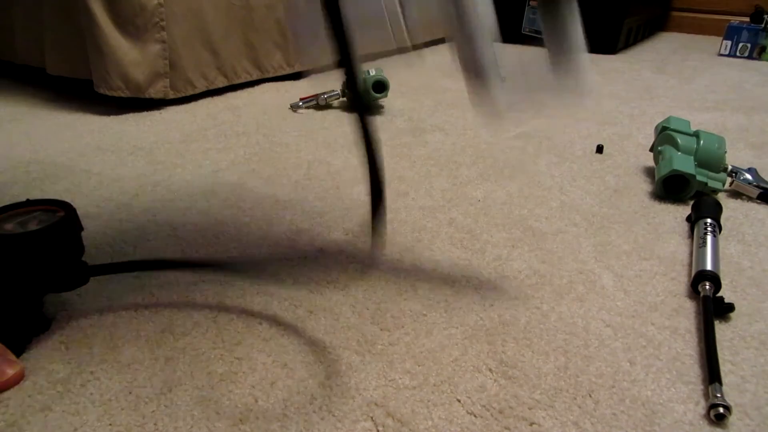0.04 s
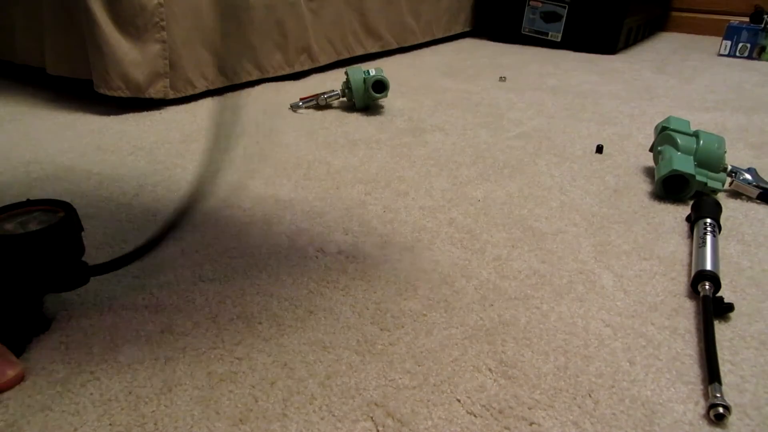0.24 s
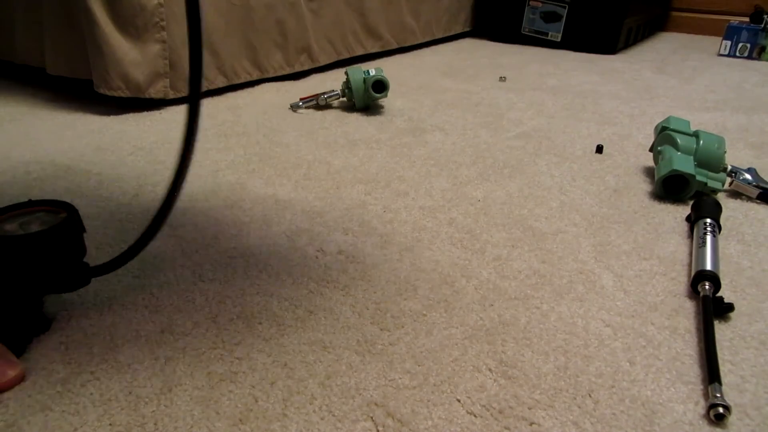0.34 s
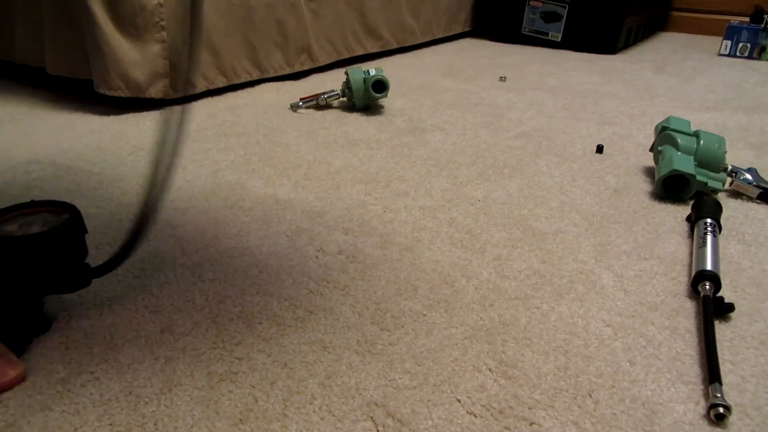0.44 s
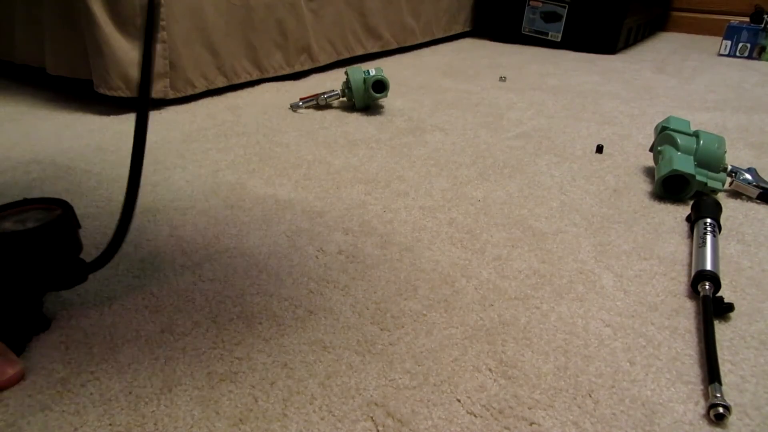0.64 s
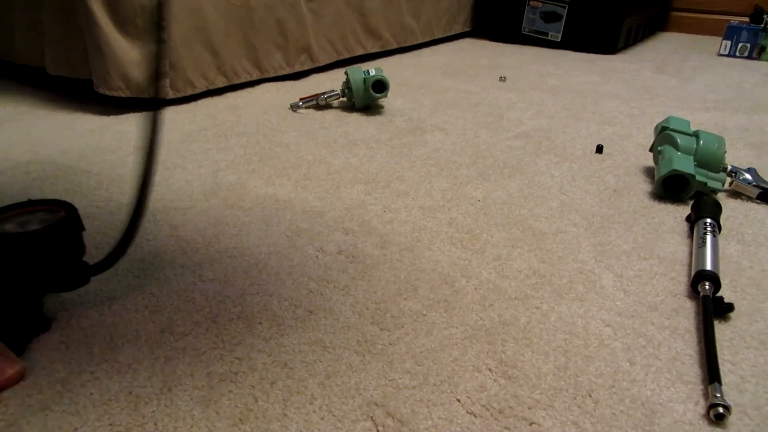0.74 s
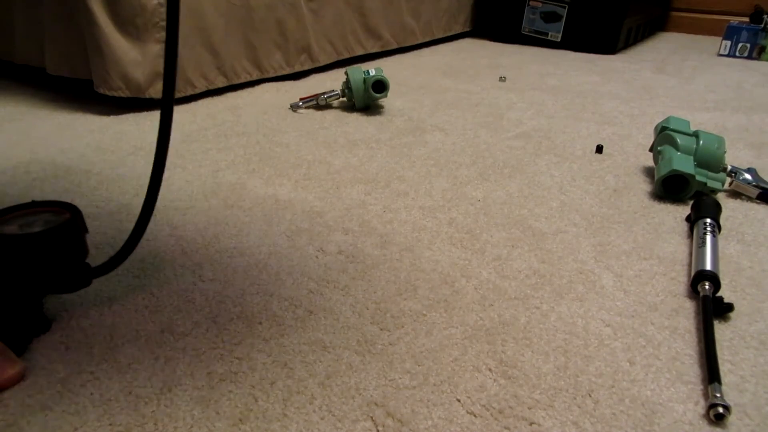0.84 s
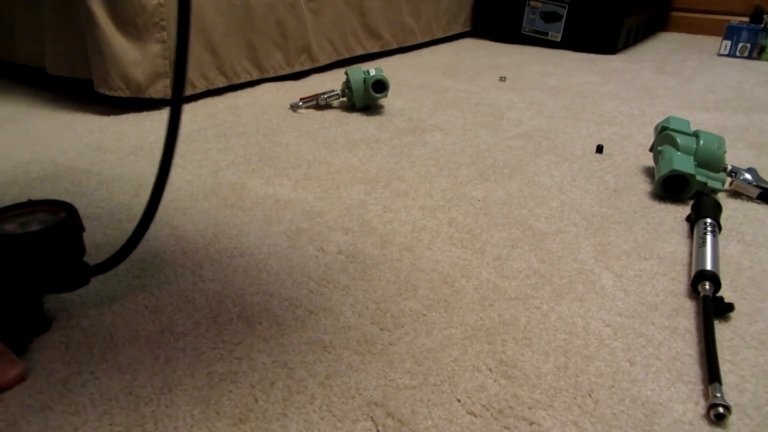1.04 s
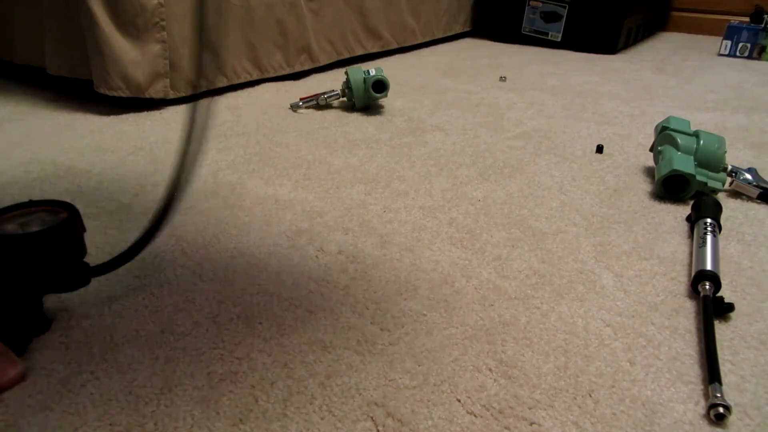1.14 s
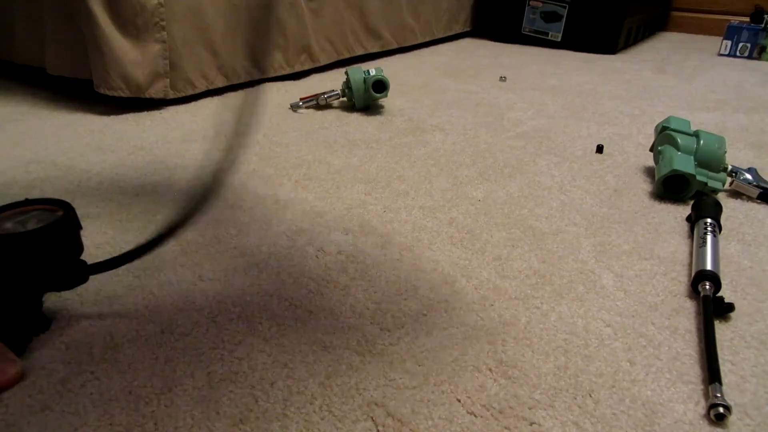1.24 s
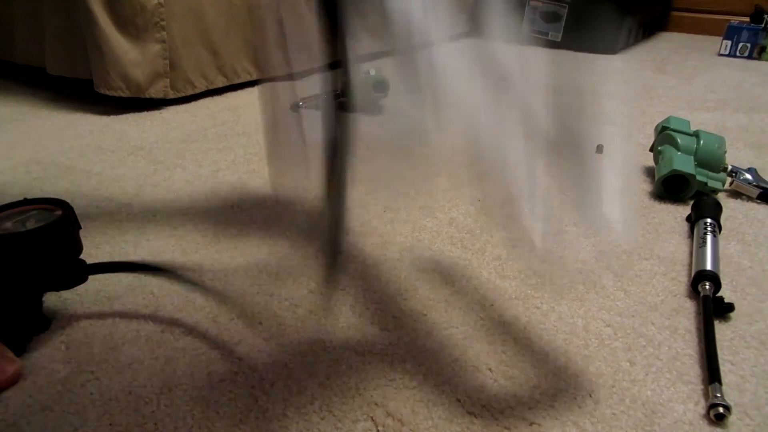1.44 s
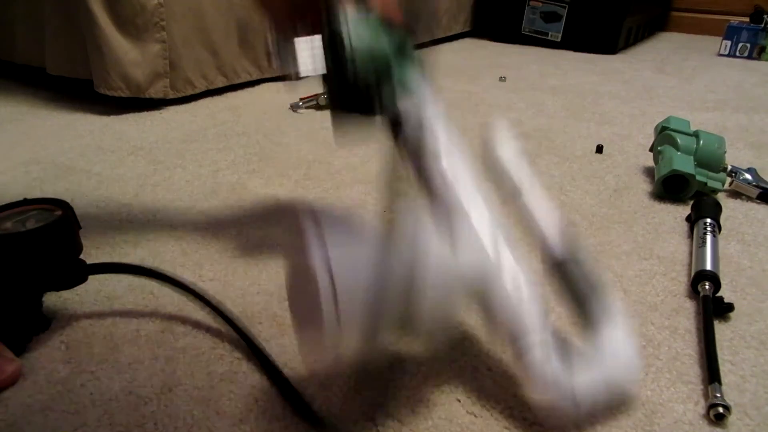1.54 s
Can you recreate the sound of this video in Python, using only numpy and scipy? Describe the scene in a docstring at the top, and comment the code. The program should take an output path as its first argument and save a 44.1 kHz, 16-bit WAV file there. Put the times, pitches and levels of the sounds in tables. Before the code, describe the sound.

A hand air pump is worked once, close by in a carpeted room. Its handle clacks, the piston rubs up with a brief squeak and slides down, air hisses, and a sharp knock leaves a softer hiss and light clicks.

```python
"""A handle clacks, then a hand air pump rubs and hisses through one stroke, close by in a carpeted room.
The piston's seal rubs up the barrel and down again, making the tube ring with many tiny slips.
Air hisses through the valve and hose, and the piston knocks on the bottom.
A softer hiss with a sinking pitch lingers among a few light clicks."""
import sys
import numpy as np
from scipy import signal
from scipy.fft import rfft, irfft
from scipy.io import wavfile

SR = 44100
rng = np.random.default_rng(int(sys.argv[2]) if len(sys.argv) > 2 else 0)


def digitize_waveform(pressure):
    """Quantize a signal to 16-bit integers and store it at the path in sys.argv[1].

    Rows of a 2-D input are taken as channels; values are limited to [-1, 1].
    """
    field = np.atleast_2d(pressure).T
    bounded = np.clip(field, -1, 1)
    quanta = np.round(bounded * 32767).astype(np.int16)
    wavfile.write(sys.argv[1], SR, quanta)


N = 70560
T = np.arange(N) / SR
BINS_HZ = np.maximum(np.fft.rfftfreq(N, 1 / SR), 1)

# ringing tones of a clack or snap: pitch_hz, level_db, ring_s (time to fade by 60 dB)
CLACK_TONES = [(676, -6.5, 0.021), (860, -6.5, 0.021), (1410, -14.5, 0.017), (1950, -5.5, 0.0097),
               (2450, -1, 0.012), (3190, -5.5, 0.0049), (3670, -4.5, 0.0032), (5260, -8, 0.0052),
               (6800, -29, 0.0085)]
# tone colour of a clack or snap: pitch_hz, gain_db
CLACK_COLOUR = [(100, -11.5), (480, -13), (700, -3), (7000, -1), (9000, -13), (13000, -18)]
# stereo width of the pump and of the hiss: pitch_hz, side_db (compared with the middle)
PUMP_WIDTH = [(40, -3), (150, -16), (500, -19.5), (1200, -19.5), (2200, -15.5), (4200, -9.5), (8000, -4),
              (13000, 2.5)]
HISS_WIDTH = [(500, -15), (2000, -13.5), (4000, -13.5), (8000, -8), (13000, -11.5)]


def seal_rub(stroke):
    """Tiny slips of the seal ring the barrel; the faster it slides, the higher their strongest pitch."""
    # tone colour of the rub: pitch_hz, gain_db
    rub_colour = [(60, -48), (110, -13), (160, -5.5), (300, -3), (600, 2), (1000, 4.5), (2000, 9),
                  (5000, 18.5)]
    peak_db, peak_octaves, treble_slope, flutter_db = 6, 0.24, 2.66, 2
    slips = rfft(colour(barrel(tiny_slips(per_s=2500, spread_db=2)), rub_colour))
    edge_octave = np.log2(pitch(stroke))
    rub, power = 0, 0
    # narrow bands are boosted near the moving edge pitch and turned down above it
    for octave in np.arange(5, 14, 1 / 3):
        band = irfft(slips * np.maximum(1 - 3 * np.abs(np.log2(BINS_HZ) - octave), 0), N)
        above = octave - edge_octave
        peak = from_db(peak_db * np.exp(-(above / peak_octaves) ** 2 / 2))
        gain = peak / np.sqrt(1 + 2 ** (2 * treble_slope * above))
        rub += gain * band
        power += gain ** 2 * np.mean(band ** 2)
    flutter = from_db(flutter_db * drift(rate_hz=53))
    return unit_power(rub / np.sqrt(power)) * level(stroke) * flutter


def seal_rasp():
    """Coarser, brighter slips swell and die away where the seal catches."""
    # each catch: peak_s, level_db, rise_s, fall_s
    catches = [(.284, -21.5, 0.011, 0.022), (.324, -23.5, 0.011, 0.024), (.349, -30.5, .008, 0.017),
               (.605, -40.5, 0.0068, 0.022), (.65, -33.5, 0.054, 0.018)]
    # tone colour of the rasp: pitch_hz, gain_db
    rasp_colour = [(300, -42.5), (800, -9), (1400, -5.5), (2400, -6), (3600, -6), (5500, -17),
                   (8000, -25.5), (15000, -32)]
    slips = barrel(tiny_slips(per_s=2200, spread_db=3))
    return swells(catches) * unit_power(colour(slips, rasp_colour))


def seal_chatter():
    """The seal sticks and slips almost evenly, so the tube squeaks, then it snaps free."""
    # each squeak: peak_s, level_db, rise_s, fall_s
    squeaks = [(.252, -21.5, .004, .008), (.262, -14.5, .003, .004)]
    # tone colour of the squeak: pitch_hz, gain_db
    squeak_colour = [(400, -25), (750, -2), (1420, -4), (1750, 11), (2100, 1), (3300, 5.5), (4500, -2),
                     (6500, -16), (9000, -17), (15000, -41)]
    slip_hz, jitter, spread_db = 705, 0.046, 2.5
    snap_s, snap_db = .2629, -12
    cycles = np.floor(np.cumsum(slip_hz * (1 + jitter * drift(rate_hz=300))) / SR)
    pulses = np.diff(cycles, prepend=0) * from_db(spread_db * rng.standard_normal(N))
    pulses += from_db(-1.5) * resonate(pulses, hz=1430, width_hz=71)
    squeak = swells(squeaks) * unit_power(colour(barrel(pulses), squeak_colour))
    return squeak + from_db(snap_db) * colour(strike(snap_s, CLACK_TONES), CLACK_COLOUR)


def tiny_slips(per_s, spread_db):
    """The seal slips at random moments, each time by a different amount."""
    sizes = from_db(spread_db * np.minimum(rng.exponential(1, (2, N)), 4))
    signs = rng.choice([-1, 1], (2, N))
    slipping = rng.random((2, N)) < per_s / SR
    return widen(sizes * signs * slipping, PUMP_WIDTH)


def barrel(x):
    """The pump tube rings with whatever rubs inside it."""
    # where the tube rings: pitch_hz, width_hz, gain_db
    tube_tones = [(612, 30, 3), (650, 20, 1), (746, 20, 2), (853, 16, 3), (933, 14, 14), (1010, 14, 10),
                  (1091, 16, 4), (1431, 50, 8), (1484, 16, 11), (1577, 16, 7), (1955, 30, 6), (2025, 20, 7),
                  (2226, 20, 5), (2532, 24, 7), (3306, 30, 8)]
    return x + sum(from_db(db) * resonate(x, hz, width) for hz, width, db in tube_tones)


def piston_knock():
    """The piston hits bottom with a sharp crack, then the base kicks back with a dull ring and the tube rings
    on."""
    # ringing tones of the knock, from the base and the tube it sets ringing: pitch_hz, level_db, ring_s
    knock_tones = [(188, -26.5, 0.084), (366, -21, 0.022), (510, -2, .014), (592, -2, 0.027),
                   (612, -25.5, 0.18), (847, -20, 0.12), (945, -23, 0.089), (1490, -7.5, 0.021),
                   (2070, -41, .014), (3650, -4, 0.0036)]
    hit_s, crack_s, kick_delay_s = 1.1639, 0.00015, 0.000734
    crack = from_db(-5.5) * np.exp(-((T - hit_s - 2 * crack_s) / crack_s) ** 2)
    return crack - from_db(-9.5) * strike(hit_s + kick_delay_s, knock_tones)


def handle_clack():
    """The hard plastic handle hits and bounces a few times very quickly."""
    # each hit: start_s, level_db
    hits = [(.048, -22), (.0494, -19.5), (.0504, -23), (.0537, -35)]
    return colour(sum(from_db(db) * strike(s, CLACK_TONES) for s, db in hits), CLACK_COLOUR)


def hose_hiss():
    """A jet of air from the valve makes the hose ring at its own steady pitches."""
    # loudness of the flow: time_s, level_db
    flow = [(.68, -46), (.75, -43.5), (.82, -41), (.9, -37), (1.0, -35), (1.12, -34), (1.17, -35),
            (1.22, -42), (1.27, -45), (1.34, -47.5), (1.5, -73)]
    # where the hose rings: pitch_hz, width_hz, gain_db
    hose_tones = [(777, 48, 16.5), (1311, 31, 26.5), (1760, 49, 21.5), (2111, 59, 19), (2870, 110, 10),
                  (3453, 45, 20.5), (3730, 82, 19), (4270, 61, 17.5), (4670, 44, 18), (5440, 83, 12.5),
                  (5820, 47, 14.5), (6850, 43, 11.5), (7260, 42, 10.5), (7790, 49, 8), (8580, 100, 13.5),
                  (9930, 200, 7), (14400, 440, 3)]
    # tone colour of the flow: pitch_hz, gain_db
    flow_colour = [(300, -5.5), (900, -3.5), (2000, 2.5), (2500, -2), (3400, 1.5), (5000, 3), (9000, 0),
                   (10700, 0), (11800, -10), (13000, 0), (14600, -5.5), (16000, 3)]
    jet = noise(HISS_WIDTH)
    ringing = sum((-1) ** k * from_db(db) * resonate(jet, hz, width)
                  for k, (hz, width, db) in enumerate(hose_tones))
    return level(flow) * unit_power(colour(noise(HISS_WIDTH) + ringing, flow_colour))


def piston_draught():
    """Air hisses smoothly past the moving piston."""
    # loudness of the draught: time_s, level_db
    loudness = [(.12, -57.5), (.168, -48), (.22, -39.5), (.27, -36), (.36, -36.5), (.44, -39), (.48, -43.5),
                (.52, -62), (.56, -53), (.61, -49), (.68, -45), (.742, -39.5), (.8, -55), (.9, -61)]
    # tone colour of the draught: pitch_hz, gain_db
    draught_colour = [(1000, -14.5), (3400, 2), (5200, -5), (7200, 2), (9000, -6), (12000, -13.5),
                      (15500, -19)]
    return level(loudness) * unit_power(colour(noise(PUMP_WIDTH), draught_colour))


def seeping_air():
    """Air seeps after the stroke, with a breathy whistle that sinks as the pressure eases."""
    # course of the seeping: time_s, level_db, pitch_hz
    seep = [(1.2, -60, 1940), (1.27, -52, 1922), (1.31, -41, 1935), (1.38, -43, 1850), (1.45, -42.5, 1790),
            (1.53, -43.5, 1728), (1.56, -53.5, 1710), (1.6, -53, 1740)]
    # tone colour of the seeping: pitch_hz, gain_db
    seep_colour = [(400, -13), (850, 0), (1300, -4), (2350, 1.5), (2900, -4.5), (3600, 5), (4050, -3.5),
                   (4800, -4.5), (6000, -10), (9500, -16), (15000, -30)]
    width_hz, whistle_gain_db = 80, 16
    wobble = signal.sosfilt(signal.butter(1, width_hz / 2, fs=SR, output="sos"), noise(HISS_WIDTH))
    whistle = np.sqrt(2) * wobble * np.cos(2 * np.pi * np.cumsum(pitch(seep)) / SR)
    hiss = noise(HISS_WIDTH) + from_db(whistle_gain_db) * whistle
    return level(seep) * unit_power(colour(hiss, seep_colour))


def valve_clicks():
    """The valve and fittings click: each click is a tiny burst of noise around one pitch."""
    # each click: start_s, level_db, pitch_hz, fade_s
    clicks = [(0.144, -52, 2020, .003), (0.5436, -40.5, 3940, 0.0045), (0.664, -26.5, 4140, .0016),
              (.664, -34.5, 8500, 0.0018), (0.87, -39, 9100, .003), (1.2443, -35, 12100, .002),
              (1.2786, -30.5, 5370, 0.0017), (1.2792, -41, 12000, .0015), (1.292, -32.5, 4000, 0.0019),
              (1.44, -55, 5000, .0015), (1.466, -31, 5140, 0.0014), (1.5103, -39, 7000, 0.0028),
              (1.519, -34, 7000, 0.0018), (1.5192, -39, 2820, .002), (1.529, -53, 7300, .007)]
    sound = 0
    for start_s, db, hz, fade_s in clicks:
        burst = noise(HISS_WIDTH) * (T >= start_s) * np.exp(-np.abs(T - start_s) / fade_s)
        width_hz = 0.4 * hz
        click = resonate(resonate(burst, hz, width_hz), hz, width_hz)
        sound += from_db(db) * np.sqrt(SR / width_hz) * click
    return sound


def carpet_thuds():
    """The pump shifts on the carpet as the piston sets off up, then down."""
    # each thud: start_s, level_db
    thuds = [(.141, -39.5), (0.5434, -39)]
    # low tones of a thud: pitch_hz, level_db, ring_s
    thud_tones = [(155, -1.5, 0.086), (230, 0.5, 0.063), (423, -15, .025)]
    return sum(from_db(db) * strike(s, thud_tones) for s, db in thuds)


def in_room(x, echo_db):
    """The carpeted room adds a short, soft echo to a sound."""
    # tone colour of the echo: pitch_hz, gain_db
    echo_colour = [(100, -9), (350, -7.5), (520, -0.5), (700, 0), (1200, 1.5), (2500, 4), (6000, -5),
                   (15000, -12)]
    ring_s, gap_s, side_db = .22, .007, -12
    middle, side = colour(rng.standard_normal((2, N)), echo_colour)
    fade = np.exp(-np.log(1000) * T / ring_s) * (T > gap_s)
    stereo = middle + from_db(side_db) * side * np.array([[1], [-1]])
    tail = stereo * fade / np.sqrt(np.sum(fade ** 2))
    return x + from_db(echo_db) * signal.fftconvolve(np.atleast_2d(x), tail, axes=1)[:, :N]


def background():
    """Quiet, wide room noise lies under everything."""
    # tone colour of the room noise: pitch_hz, gain_db
    noise_colour = [(25, -9), (60, -9), (100, -11.5), (160, -3.5), (230, -3.5), (290, 2), (370, -6.5),
                    (560, -4.5), (900, -9.5), (2000, -9.5), (3500, -11.5), (7000, -20.5), (15000, -28)]
    # its stereo width: pitch_hz, side_db
    noise_width = [(30, 8), (80, 10), (200, 2.5), (500, 6), (1000, 12), (2500, 5.3), (13000, 3.5)]
    return from_db(-45.5) * unit_power(colour(noise(noise_width), noise_colour))


def from_db(db):
    """Turn decibels into a number to multiply by."""
    return 10 ** (np.asarray(db) / 20)


def unit_power(x):
    """Scale a sound so its average power is 1."""
    return x / np.sqrt(np.mean(x ** 2) + 1e-20)


def level(rows):
    """Loudness from time_s, level_db rows: silent before them, fading after them."""
    s, db = np.transpose(rows)[:2]
    fade_out = np.exp(-np.maximum(T - s[-1], 0) * 20)
    return from_db(np.interp(T, s, db)) * (T >= s[0]) * fade_out


def pitch(rows):
    """Pitch over time from time_s, level_db, pitch_hz rows."""
    s, _, hz = np.transpose(rows)
    return np.interp(T, s, hz)


def swells(rows):
    """Loudness that rises to each peak and falls away."""
    return np.sqrt(sum(from_db(db) ** 2 * np.exp(-2 * np.maximum((s - T) / rise, (T - s) / fall))
                       for s, db, rise, fall in rows))


def colour(x, points):
    """Turn pitches up or down along pitch_hz, gain_db points."""
    hz, db = np.transpose(points)
    return irfft(rfft(x) * from_db(np.interp(np.log(BINS_HZ), np.log(hz), db)), N)


def resonate(x, hz, width_hz):
    """Let a sound ring around one pitch and weaken the rest."""
    r = np.exp(-np.pi * width_hz / SR)
    feedback = [1, -2 * r * np.cos(2 * np.pi * hz / SR), r * r]
    return signal.lfilter(np.array([1, 0, -1]) * (1 - r * r) / 2, feedback, x + 1e-18)


def strike(start_s, tones):
    """One hit starts several tones, each fading at its own speed."""
    age = np.maximum(T - start_s, 0)
    return sum(from_db(db - 60 * age / ring_s) * np.sin(2 * np.pi * hz * age) for hz, db, ring_s in tones)


def widen(pair, width):
    """Make left and right from a middle sound and an unrelated side sound."""
    return pair[0] + colour(pair[1], width) * np.array([[1], [-1]])


def noise(width):
    """Plain hiss in stereo."""
    return widen(rng.standard_normal((2, N)), width)


def drift(rate_hz):
    """A smooth random wobble, about 1 in size."""
    return unit_power(irfft(rfft(rng.standard_normal(N)) / (1 + (BINS_HZ / rate_hz) ** 2), N))


def scene():
    """The pump's body stands a little to the left, the hiss a little to the right."""
    # the seal sliding up, then down: time_s, level_db, edge_hz (the rub weakens above this pitch)
    upstroke = [(.12, -64, 220), (.142, -52, 226), (.17, -40, 380), (.22, -26, 600), (.26, -24.5, 824),
                (.295, -26, 830), (.34, -19, 1035), (.39, -23.5, 930), (.436, -34, 760), (.48, -50, 600),
                (.52, -67, 300)]
    downstroke = [(.535, -53, 170), (.56, -48, 350), (.598, -28.5, 740), (.636, -22, 970), (.68, -28, 750),
                  (.715, -35, 610), (.77, -41, 293), (.8, -39, 210), (.88, -50, 172), (1.14, -58, 167)]
    body_pan_db, hiss_pan_db = 1.35, -1  # left minus right
    low_cut_hz = 152  # the deep bass of the rubbing, knocks and their echo is turned down
    rub = seal_rub(upstroke) + seal_rub(downstroke) + seal_rasp() + seal_chatter()
    body = in_room(rub + carpet_thuds(), echo_db=-12.5)
    body += in_room(piston_knock(), echo_db=-9) + in_room(handle_clack(), echo_db=-5)
    body = signal.sosfilt(signal.butter(2, low_cut_hz, "high", fs=SR, output="sos"), body)
    hiss = piston_draught() + hose_hiss() + seeping_air() + in_room(valve_clicks(), echo_db=-2)
    sides = np.array([[.5], [-.5]])
    return body * from_db(body_pan_db * sides) + hiss * from_db(hiss_pan_db * sides) + background()


def record(dry):
    """The very highest treble is cut off steeply."""
    cutoff_hz = 15750
    return signal.sosfilt(signal.ellip(10, .1, 80, cutoff_hz, fs=SR, output="sos"), dry)


dry = scene()
out = record(dry)
digitize_waveform(out)
```